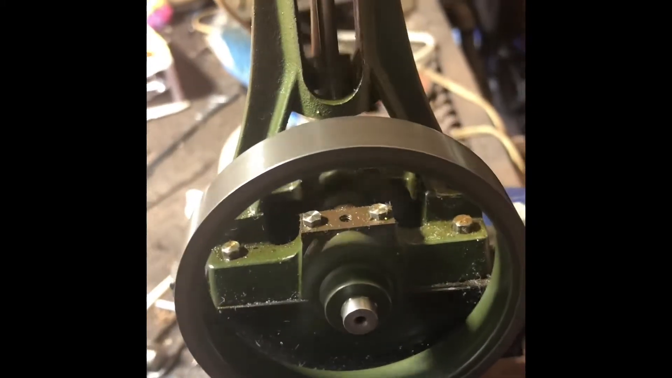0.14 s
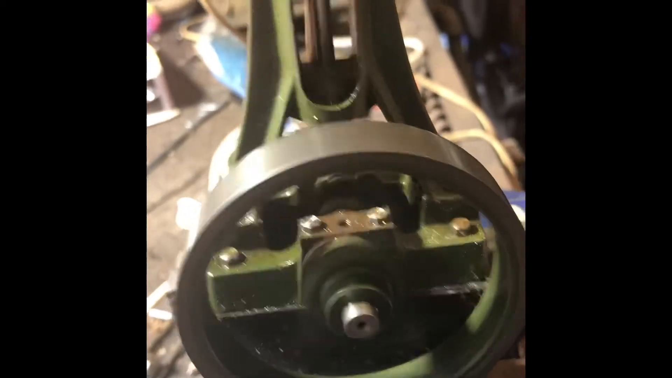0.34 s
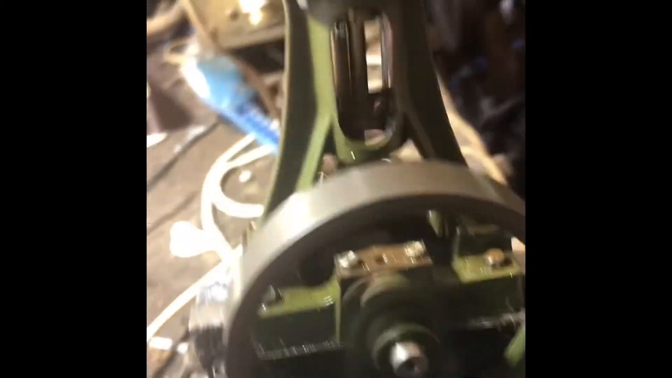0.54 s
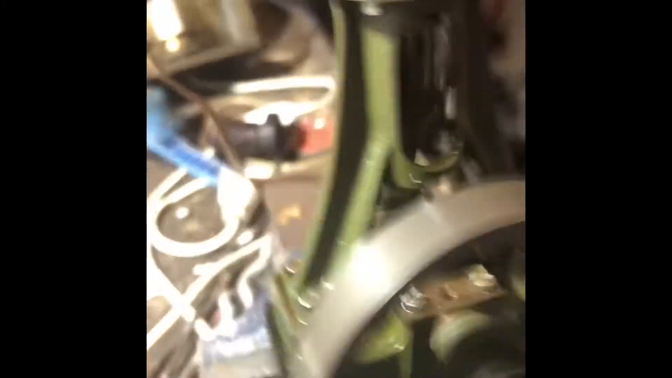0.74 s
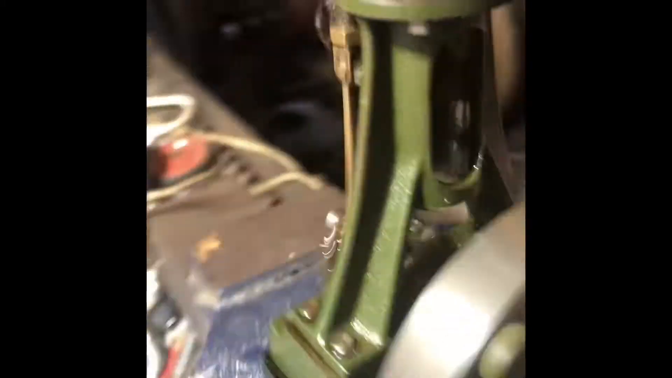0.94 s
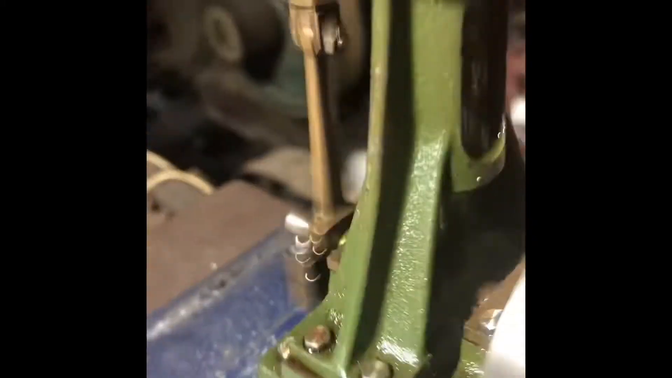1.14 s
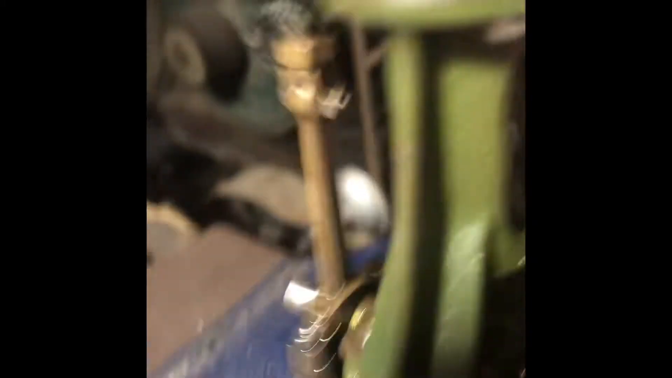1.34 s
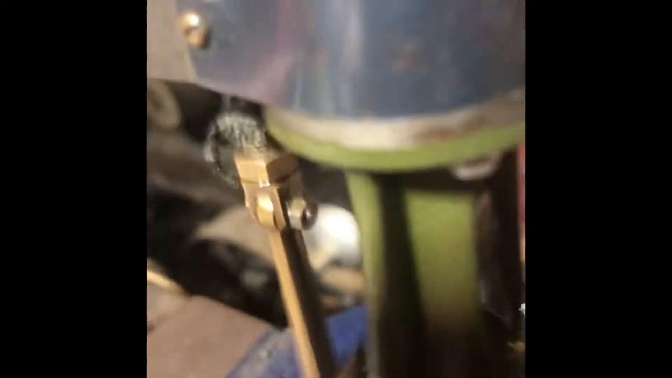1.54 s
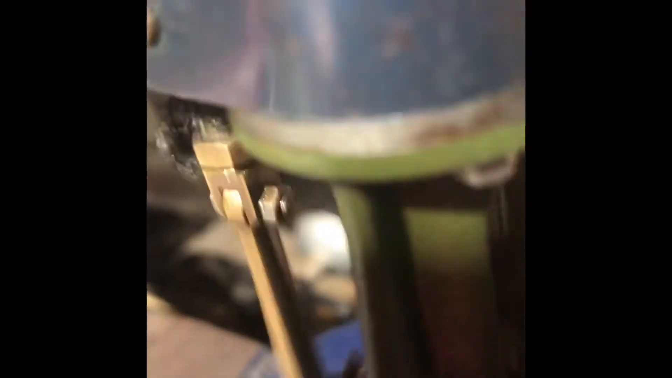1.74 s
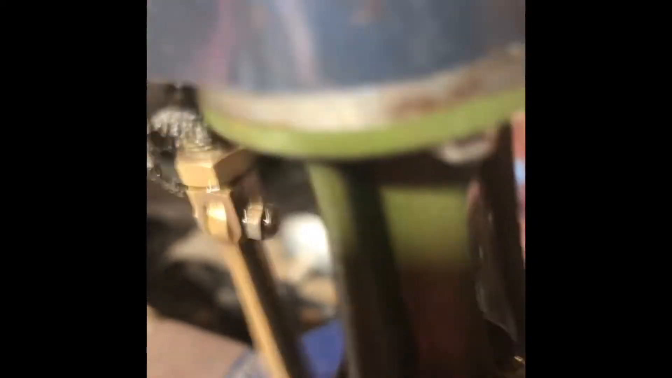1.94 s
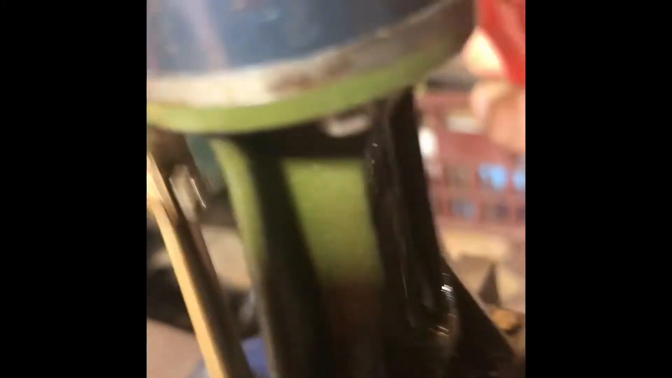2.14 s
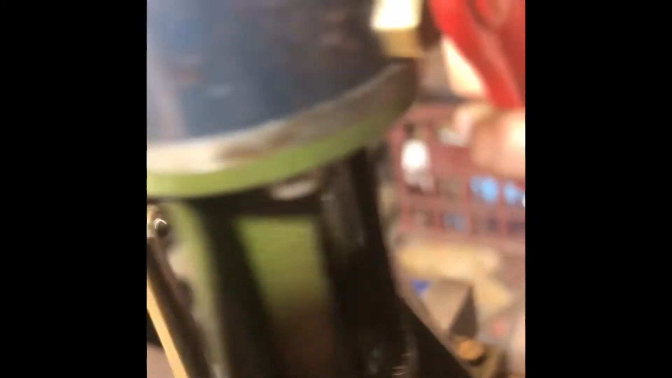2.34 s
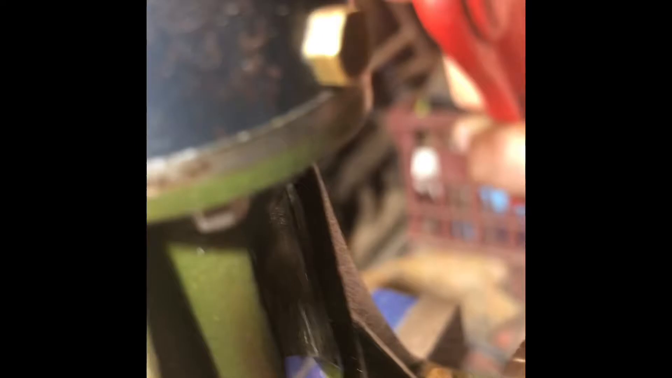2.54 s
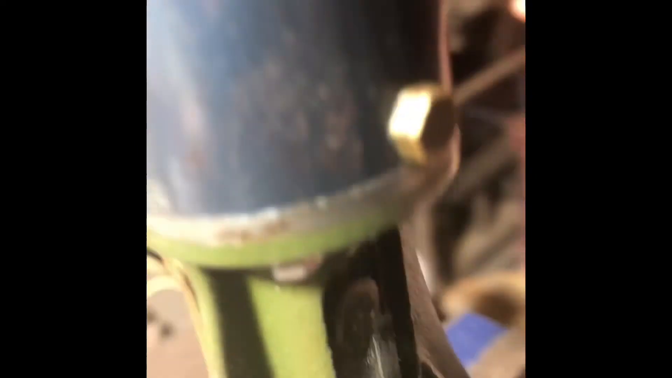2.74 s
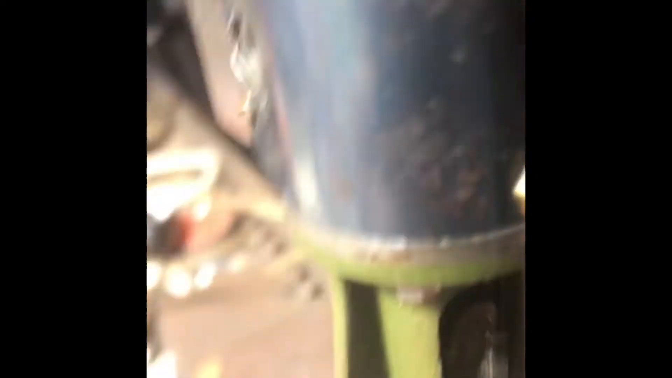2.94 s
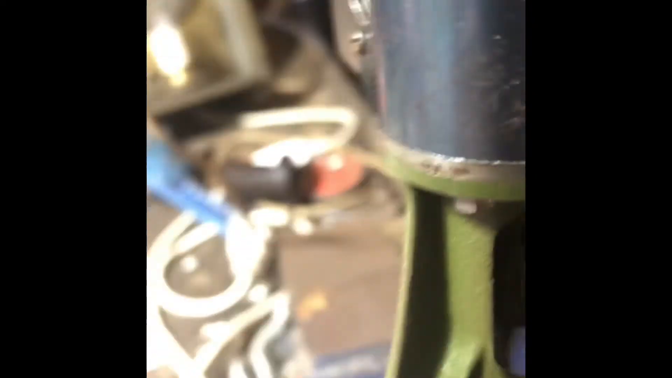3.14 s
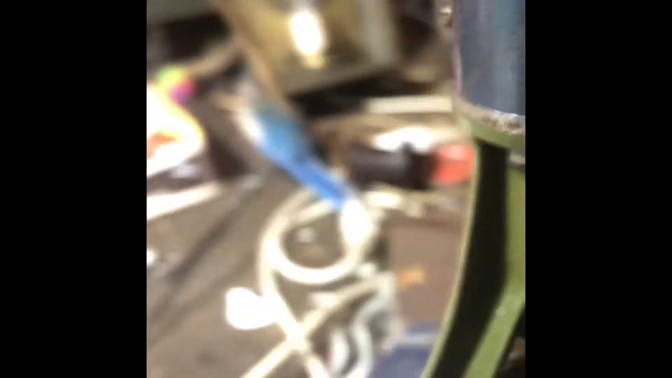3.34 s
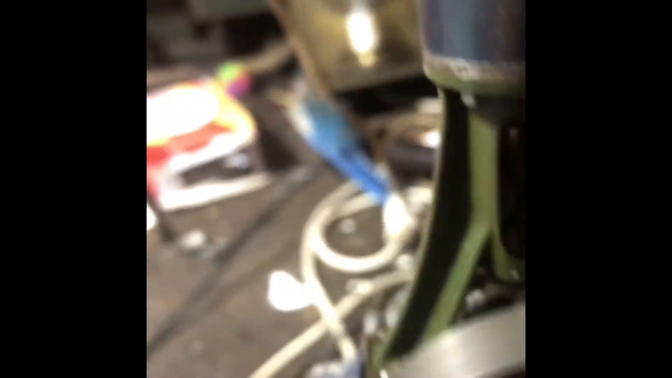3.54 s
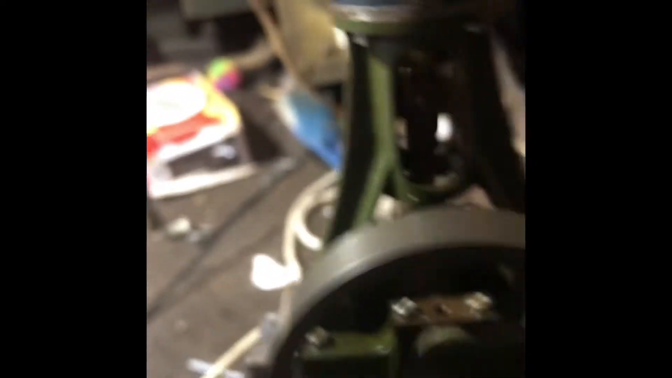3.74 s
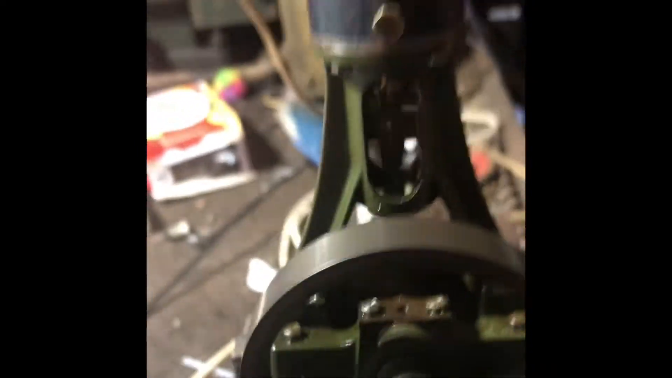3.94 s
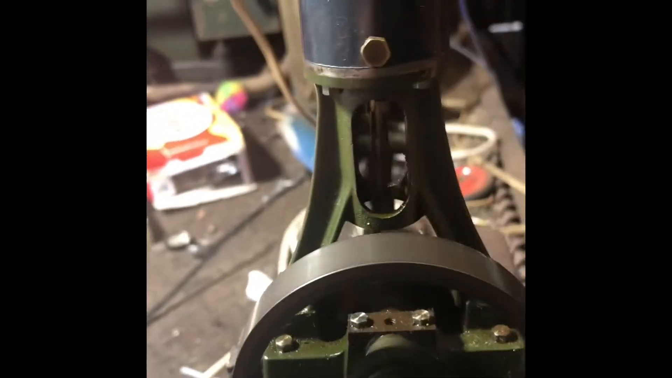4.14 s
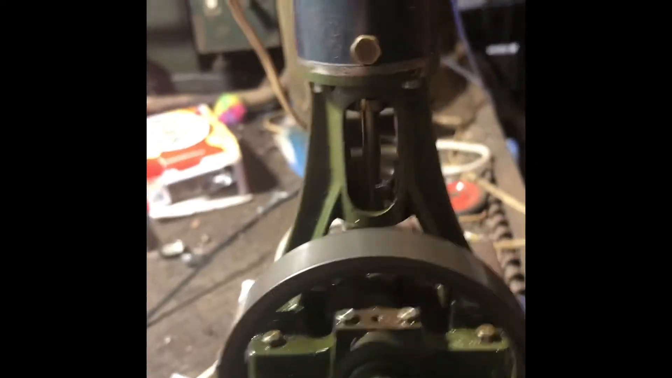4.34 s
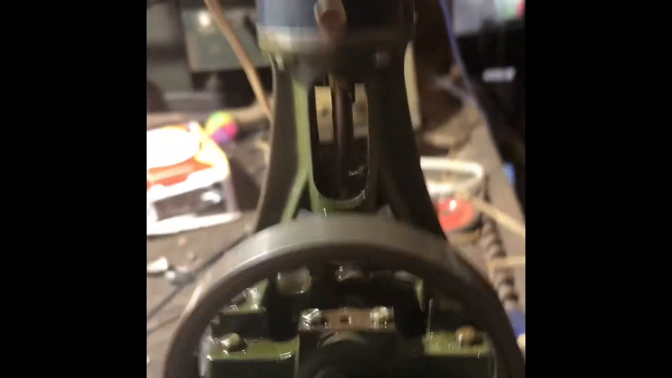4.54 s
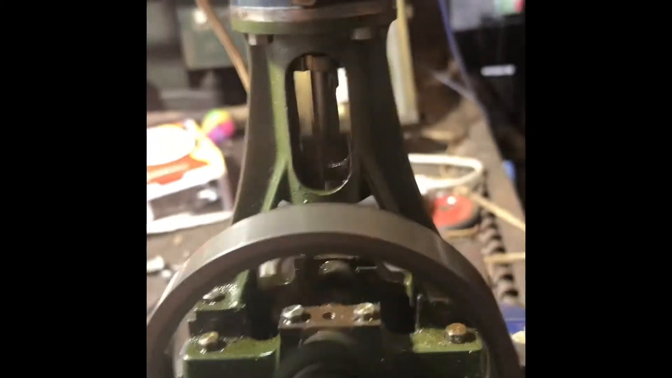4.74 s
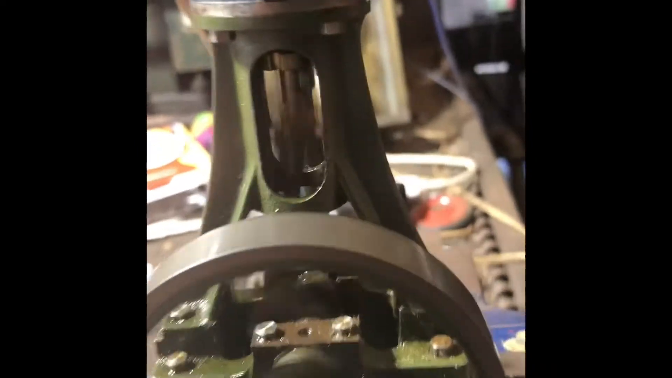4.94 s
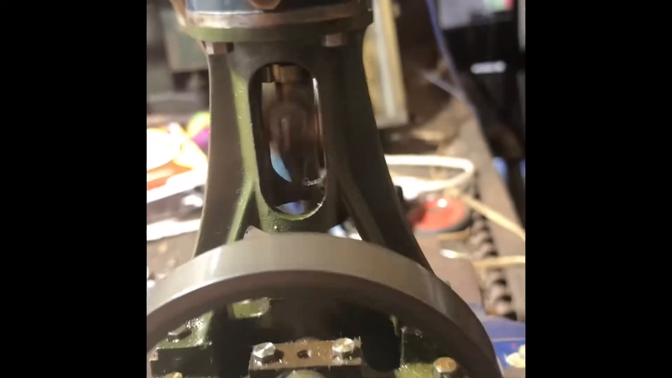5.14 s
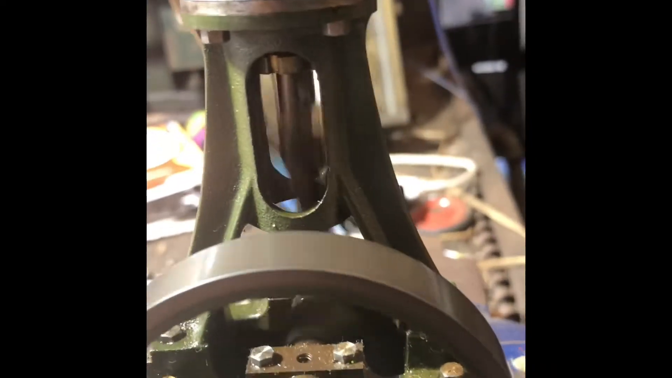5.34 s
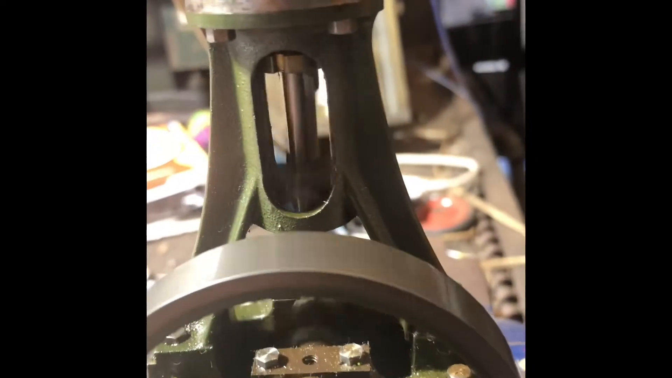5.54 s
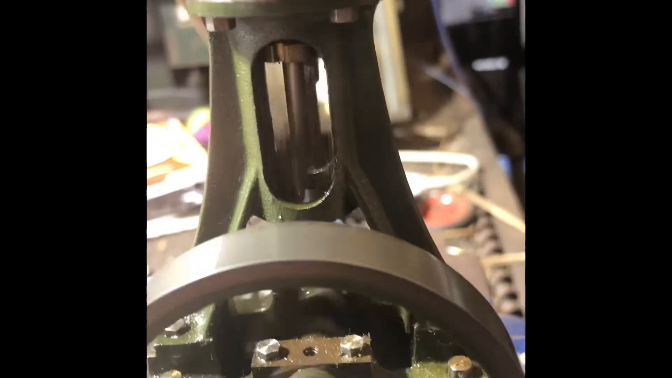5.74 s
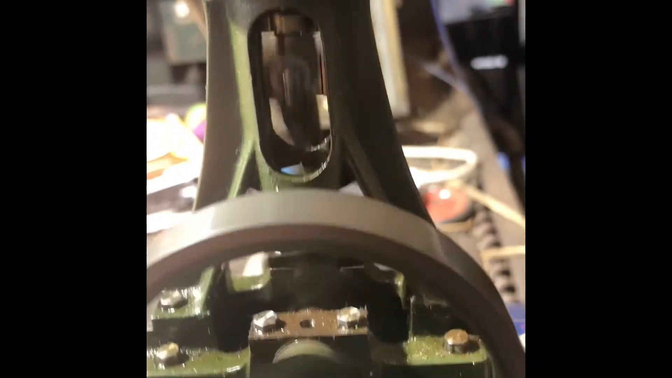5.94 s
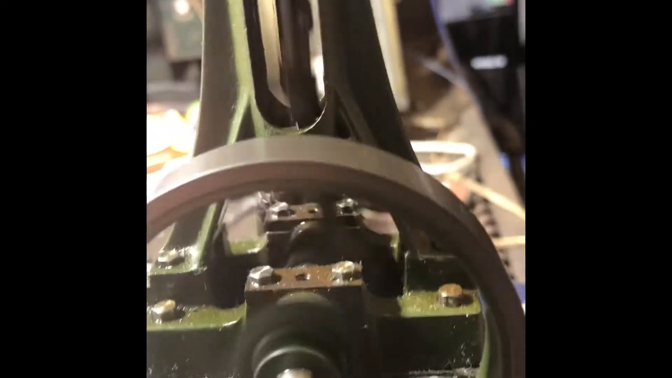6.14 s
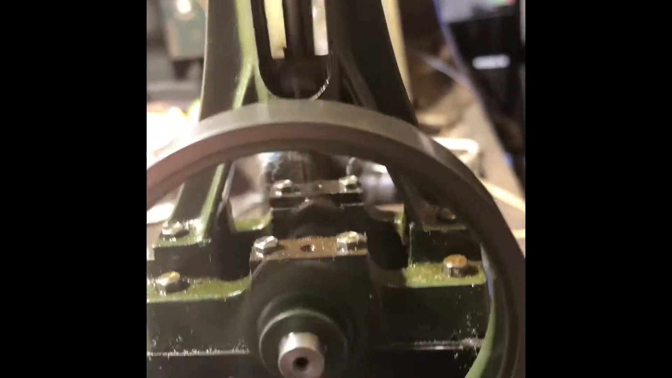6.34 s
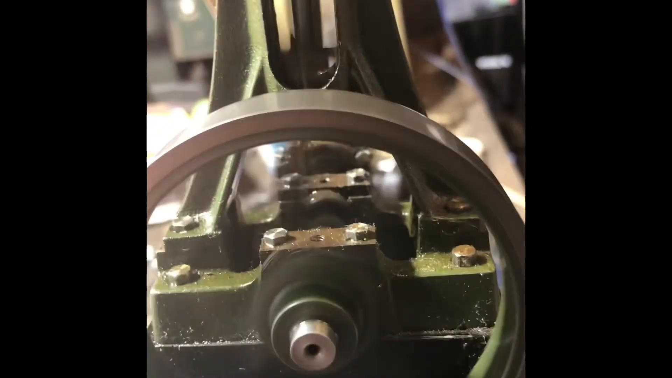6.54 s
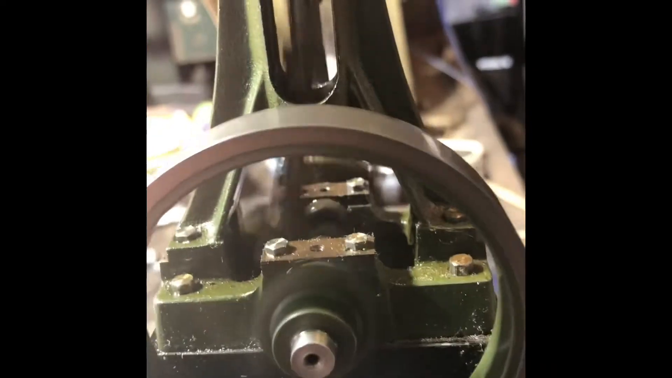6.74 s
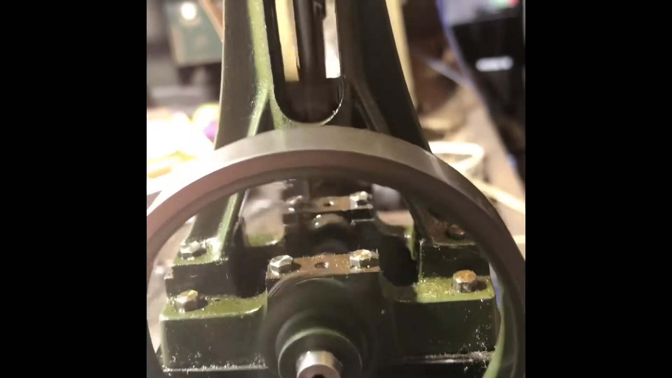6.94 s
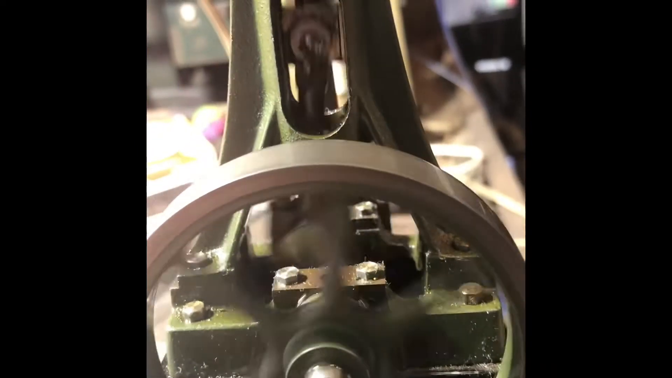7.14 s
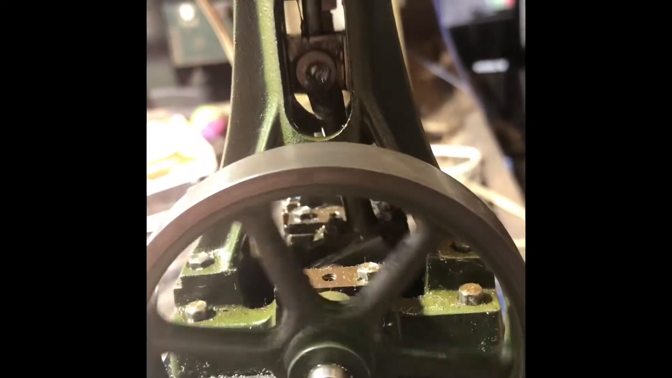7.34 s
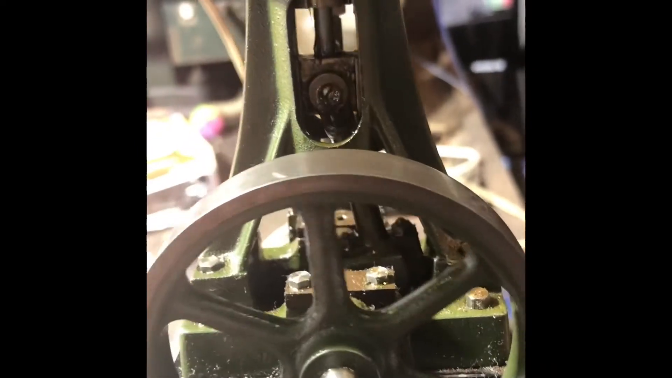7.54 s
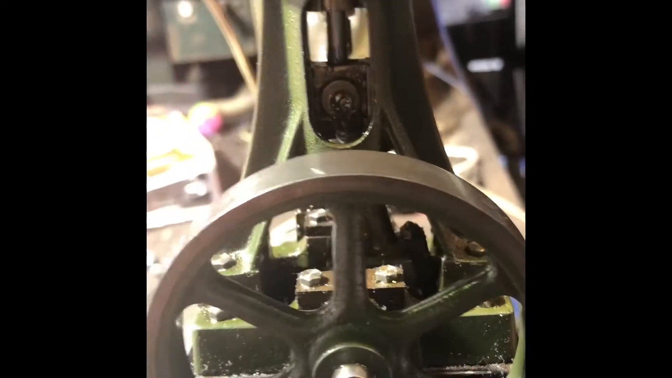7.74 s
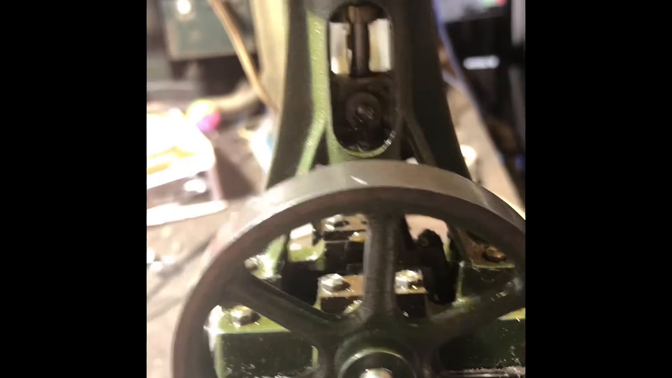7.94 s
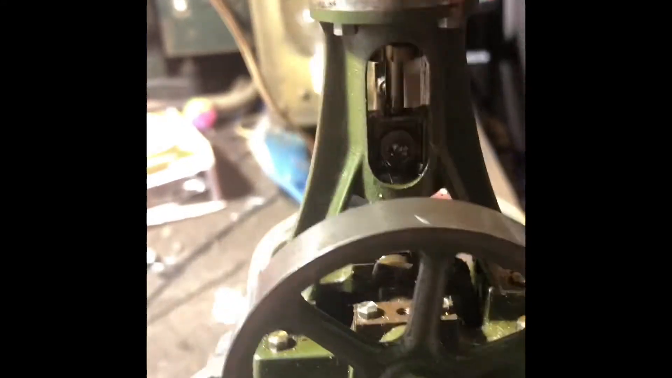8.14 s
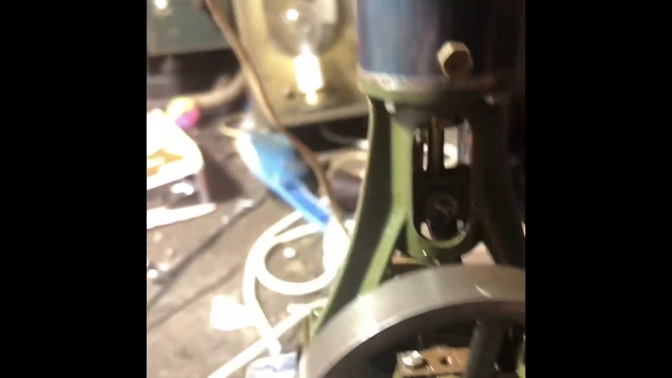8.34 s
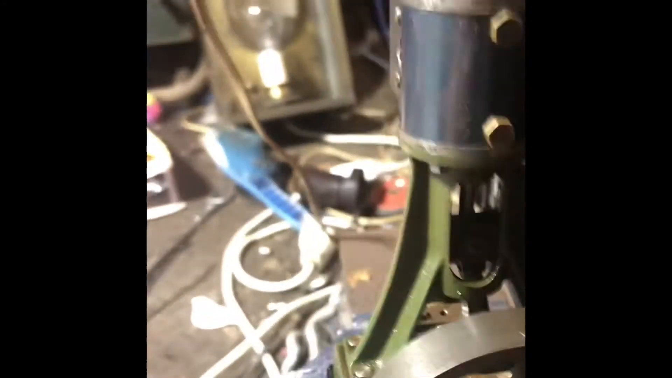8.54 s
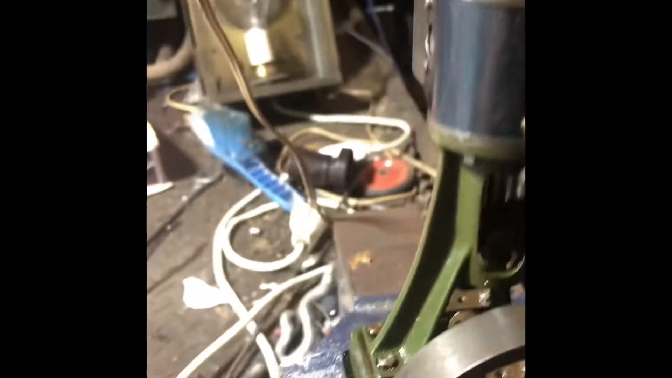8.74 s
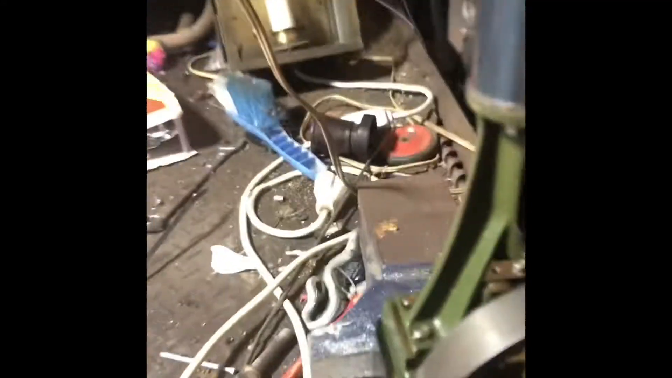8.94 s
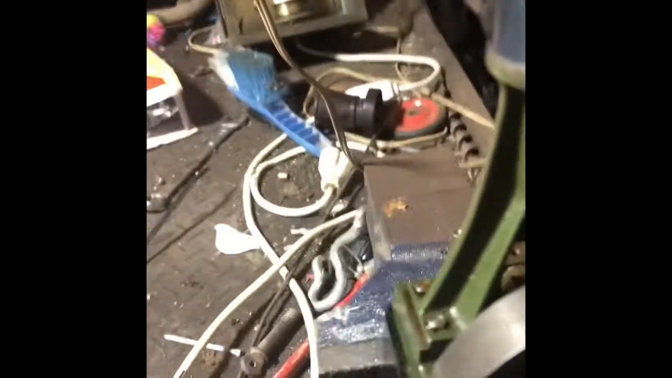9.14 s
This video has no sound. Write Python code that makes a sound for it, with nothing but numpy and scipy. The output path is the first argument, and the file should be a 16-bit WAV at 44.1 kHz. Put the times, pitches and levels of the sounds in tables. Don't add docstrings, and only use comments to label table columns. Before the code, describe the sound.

Close, dry, mono handheld pickup of rapid airy chuffing, merged into a fluttering treble-heavy hiss that slows slightly and dips in level midway. The flow collapses just before seven seconds and a small fitting pings. What remains is a low buzzing compressor across the workshop, faint air hiss and rumble, several muffled bench thuds, one crisp click with a rebound, and a final firmer knock.

```python
import sys
import numpy as np
from scipy import signal
from scipy.fft import rfft, irfft, next_fast_len
from scipy.io import wavfile
from scipy.ndimage import uniform_filter1d

SR = 44100
rng = np.random.default_rng(int(sys.argv[2]) if len(sys.argv) > 2 else 0)


def to_wav(sig):
    pcm = np.clip(np.atleast_2d(sig), -1, 1) * 32767
    pcm = np.round(pcm).astype(np.int16)
    wavfile.write(sys.argv[1], SR, pcm.T)


def nominal_scale(level):
    x = np.asarray(level, float) / 20
    return 10 ** x


N = 405259
T = np.arange(N) / SR


# (time [s], jet level [dB], place behind the cylinder [0-1], workshop screened [dB], ridges [dB])
MIC_PATH = [(0, -15, 0.01, -1.5, 3), (.55, -13.5, .3, -0.2, 1.7), (.9, -13, .7, -5.5, -3),
            (1.3, -12, 1.01, -8.5, -4), (1.7, -12.5, 1.1, -8, -2), (2.2, -13, .8, -7, -5),
            (2.7, -13.5, .55, -5.5, -1.5), (3.05, -16.5, .2, -6.5, -1.7), (3.4, -20, .05, -5.5, 1.2),
            (3.8, -17.5, 0.01, -2, -1), (4.45, -16.5, -.1, -0.5, -0.5), (5.3, -15.5, .05, -0.1, 0.5),
            (6.0, -15, .05, -0.6, -2), (6.55, -15, .1, -0.3, -8), (6.9, -16.5, -.1, -1, -15)]
# (time [s], level [dB])
SHUT_OFF = [
    (6.84, -3),
    (6.888, -5),
    (6.895, -4.5),
    (6.925, -15.5),
    (6.94, -25),
    (6.97, -47),
]
# (extra delay [s], level [dB])
ECHOES = [
    (.0006, -16.5),
    (.0013, -27),
    (.0027, -15),
    (.0049, -15.5),
]


def exhaust():
    jet_db, behind, screen_db, ridge_db = columns(MIC_PATH, T)
    upper, lower, gland, spit = port_openings()
    flows = jet_flows(upper, lower, spit, behind)
    jet = turbulent_jet(flows, behind, ridge_db)
    frame = frame_sound(screen_db, jet_db)
    gland_open = (gland + 0.15) * nominal_scale(1.2 * drift(9))
    direct = jet + np.sqrt(flows[1]) * frame + gland_open * gland_whistle(gland, behind)
    echoes = 0
    for delay, db in ECHOES:
        moving_delay = delay * (1 + 0.0607 * drift(0.426))
        echoes = echoes + nominal_scale(db) * np.interp(T - moving_delay, T, direct)
    supply_db = columns(SHUT_OFF, T)[0]
    return nominal_scale(jet_db - 0.9 + supply_db) * shadowed(direct + echoes) * (T < SHUT_OFF[-1][0])


# (time [s], rate [turns/s])
FLYWHEEL_SPEED = [(0.0, 20.59), (0.4, 21.02), (0.8, 21.05), (1.2, 20.19), (1.6, 18.05), (1.9, 16.55),
                  (2.3, 16.31), (2.8, 15.28), (3.4, 14.91), (4.0, 14.67), (4.5, 14.73), (4.9, 15.62),
                  (5.7, 16.59), (6.3, 15.89), (7.0, 15.49)]
START_TURN = -0.24
# (opens at [turns], stays open [turns], attack [turns], release [turns], sag while open [dB])
UPPER_PORT = (0.7, 0.57, 0.19, 0.25, -11)
LOWER_PORT = (0.19, 0.46, 0.2, 0.039, 0.5)
GLAND_GAP = (0.56, 0.59, 0.12, 0.084, 2.1)
VALVE_SPIT = (0.085, 0.073, 0.03, 0.015, 0.1)


def port_openings():
    turn = START_TURN + np.cumsum(columns(FLYWHEEL_SPEED, T)[0]) / SR
    return [opening(turn, *port) for port in (UPPER_PORT, LOWER_PORT, GLAND_GAP, VALVE_SPIT)]


def opening(turn, opens, length, attack, release, sag_db):
    age = (turn - opens) % 1
    rise = np.clip(age / attack, 0, 1)
    fall = np.clip((length - age) / release, 0, 1)
    return rise * fall * nominal_scale(sag_db * (age / length - 0.5))


# (level re jet in front [dB], change behind the cylinder [dB])
LOWER_DB, LEAK_DB, SKIRT_DB = (-3, 1.5), (-3.5, -5.5), (-19, 1)
GLAND_UPPER_DB, GLAND_LOWER_DB = (-3, -14), (-3.8, -21)
# (dull, middle, bright part of the jet [dB])
LOWER_TINT_DB, LEAK_TINT_DB, SPIT_DB = (-3.5, -1, 3), (1, -0.5, 5.5), (1, 1, -10)


def seen_db(level, behind):
    front, change = level
    return front + change * behind


def jet_flows(upper, lower, spit, behind):
    lower_db, leak_db = seen_db(LOWER_DB, behind), seen_db(LEAK_DB, behind)
    flutter = nominal_scale(0.44 * drift(23))
    flows = []
    for lower_tint, leak_tint, spit_db in zip(LOWER_TINT_DB, LEAK_TINT_DB, SPIT_DB):
        ports = upper ** 2 + (lower * nominal_scale(lower_db + lower_tint)) ** 2
        steady = nominal_scale(2 * (leak_db + leak_tint))
        flow = np.sqrt(ports + steady + (spit * nominal_scale(spit_db)) ** 2)
        running_rms = np.sqrt(uniform_filter1d(flow ** 2, size=SR // 4))
        flows.append(flow / running_rms * flutter)
    return flows


# (frequency [Hz], spectral density [dB])
JET_SPECTRUM = [(2290, -34), (3900, -6.5), (4270, -4), (4790, -5), (5370, -3.5), (7220, -4.5), (8290, -1.5),
                (9470, -3), (10400, -1.5), (12100, -2), (15200, -1), (16200, 3.5), (16500, -52)]
# (frequency [Hz], spectral density [dB])
JET_SKIRT = [(2000, -20.5), (2600, -6.5), (3200, 1.5), (3900, -1.5), (4600, -16.5)]
# (time [s], frame low [Hz], frame high [Hz], gland upper [Hz], gland lower [Hz])
VIEW_RESONANCES = [(0, 4200, 12800, 11300, 10800), (.55, 4400, 12800, 11400, 10700),
                   (1.1, 4100, 11500, 11360, 10400), (1.5, 4000, 11700, 10850, 10500),
                   (2.1, 4100, 12500, 11540, 10500), (2.8, 4000, 12400, 12600, 10500),
                   (3.4, 4050, 13000, 10600, 9950), (4.0, 4260, 12600, 11180, 10000),
                   (4.6, 4500, 13000, 11430, 10500), (5.1, 4600, 12950, 11200, 10400),
                   (5.5, 4650, 13100, 11120, 10150), (5.95, 4700, 13230, 11600, 10520),
                   (6.15, 4750, 13200, 11600, 9600), (6.9, 4940, 12700, 11570, 9500)]
RIDGE_DB = (-12, -8.5, -6.5)
BRIGHT_HZ = 10500


def turbulent_jet(flows, behind, ridge_db):
    dull, flow, bright = flows
    low_hz, high_hz = columns(VIEW_RESONANCES, T)[:2]
    low, middle, high = [nominal_scale(db + ridge_db) for db in RIDGE_DB]
    high = high * nominal_scale(5.5 * (behind - 0.4))
    broad = coloured(JET_SPECTRUM)
    under = signal.sosfilt(signal.butter(2, BRIGHT_HZ, fs=SR, output="sos"), broad)
    over = signal.sosfilt(signal.butter(2, BRIGHT_HZ, "high", fs=SR, output="sos"), broad)
    skirt = nominal_scale(seen_db(SKIRT_DB, behind)) * coloured(JET_SKIRT)
    jet = dull * (skirt + low * narrow(low_hz, width_hz=730))
    jet += flow * (under + middle * narrow(8800, width_hz=1400))
    jet += bright * (high * narrow(high_hz, width_hz=1000) - over)
    return jet


def gland_whistle(gland, behind):
    climb = 1 + 0.03 * (gland - 0.6)
    upper_hz, lower_hz = [hz * climb for hz in columns(VIEW_RESONANCES, T)[2:]]
    upper = nominal_scale(seen_db(GLAND_UPPER_DB, behind)) * narrow(upper_hz, width_hz=650)
    lower = nominal_scale(seen_db(GLAND_LOWER_DB, behind)) * narrow(lower_hz, width_hz=700)
    return upper + lower


# (frequency [Hz], spectral density [dB])
BODY_SPECTRUM = [(590, -45), (1000, -4.5), (1310, -5.5), (1420, -8), (1700, -2.5), (2900, 1.5), (3770, -24),
                 (6380, -120)]


def frame_sound(screen_db, jet_db):
    share = 0.7
    return nominal_scale(-33 + share * screen_db - jet_db) * coloured(BODY_SPECTRUM)


# (from [s], to [s], from frequency [Hz], to frequency [Hz], depth [dB])
SHADOWS = [
    (-.3, .9, 3400, 3380, -1.3),
    (.55, 1.4, 11500, 8800, -4),
    (1.9, 3.0, 7540, 7000, -1.83),
    (3.2, 4.9, 5240, 5500, -3),
    (3.9, 5.901, 12500, 12400, -3),
    (3.5, 7.2, 3500, 4100, -3),
    (4.8, 6.6, 5440, 5900, -1.7),
    (4.9, 6.2, 13700, 14000, -1.5),
    (5.8, 7.201, 10400, 10500, -4),
    (6.0, 7.2, 7600, 7250, -2.5),
]


def shadowed(x):
    width_hz, edge_s = 334, 0.19
    hz, s, frames = signal.stft(x, SR, nperseg=512)
    loss_db = 0
    for start, end, first_hz, last_hz, db in SHADOWS:
        centre = first_hz + (last_hz - first_hz) * (s - start) / (end - start)
        present = np.clip(np.minimum(s - start, end - s) / edge_s, 0, 1)
        notch = np.exp(-0.5 * ((hz[:, None] - centre) / width_hz) ** 2)
        loss_db = loss_db + db * present * notch
    return signal.istft(frames * nominal_scale(loss_db), SR)[1][:N]


# (frequency [Hz], level [dB], T60 [s])
FITTING_MODES = [
    (8683, -17, .15),
    (9350, -14, .04),
    (10903, 0, .38),
    (10937, -.5, .36),
    (12200, -16, .04),
]
# (time [s], level [dB])
FITTING_TAPS = [
    (6.966, -44),
    (6.974, -35),
]


def ringing_fitting():
    return sum(ring(s, db + mode_db, hz, t60) for s, db in FITTING_TAPS for hz, mode_db, t60 in FITTING_MODES)


# (time [s], peak level [dB])
TICKS = [
    (7.858, -17.5),
    (7.8804, -23),
]


def dry_ticks():
    crack = coloured([(800, -30), (1500, 5), (6500, -1.0), (16000, -14)])
    out = np.zeros(N)
    for s, db in TICKS:
        age = T - s
        decay_db = 60 * np.clip(age / 0.019, 0, 3)
        out += (age > 0) * nominal_scale(db - 8.0 - decay_db) * crack
    return out


# (time [s], peak level [dB], frequency [Hz], T60 [s])
BENCH_KNOCKS = [(7.058, -42, 150, .07), (7.191, -26, 143, 0.081), (7.21, -27, 200, .06),
                (7.241, -28, 90, 0.072), (7.281, -27, 120, .07), (7.482, -28, 245, 0.1),
                (7.51, -24, 109, .1), (7.539, -27, 170, .07), (7.671, -28, 323, .06), (7.98, -33, 70, .12),
                (8.048, -26, 184, .06), (8.79, -24, 770, 0.076), (8.792, -29, 930, .03),
                (8.795, -29, 450, .05), (8.8, -30, 170, .07)]


def bench_knocks():
    return sum(ring(*knock) for knock in BENCH_KNOCKS)


STROKE_HZ = 45.926
# (multiple of the stroke rate, level [dB])
STROKE_PARTIALS = [(1, -15), (2, -2), (3, -9), (4, -3), (5, -7), (6, -8), (7, -4), (8, -4), (9, -7),
                   (10, -17), (11, -12), (12, -13), (13, -18), (14, -10), (16, -12), (17, -1), (18, -5),
                   (19, -4), (20, -14), (21, -25), (28, -16), (29, -12), (30, -9), (31, -13), (32, -12),
                   (33, -7), (34, -23), (38, -22), (41, -29), (52, -29)]
PARTIAL_LAG = [(1, 0), (9, 0), (16, .2), (17, .55), (20, -.42), (29, .7), (30, .55), (34, 1.6), (52, 4.3)]


def stroke_harmonics():
    ranges = np.zeros((4, N))
    wander = [nominal_scale(0.7 * drift(0.4)) for _ in range(6)]
    multiples = np.arange(52) + 1
    lag = np.cumsum(columns(PARTIAL_LAG, multiples)[0]) + rng.normal(0, 0.14, len(multiples))
    levels = columns(STROKE_PARTIALS, multiples)[0]
    levels = levels + (levels < -18.5) * 3 * rng.standard_normal(len(multiples))
    stroke = np.exp(2j * np.pi * (STROKE_HZ * T - 0.7))
    partial = 1
    for k, db, turns in zip(multiples, levels, lag):
        partial = partial * stroke
        tone = (partial * (np.sqrt(2) * nominal_scale(db) * np.exp(-2j * np.pi * turns))).real
        place = (0, 1, 0, 2, 3, 1)[np.searchsorted((5, 20, 27, 31, 34), k)]
        ranges[place] += wander[k % 6] * tone
    return ranges


# (time [s], thump level [dB], lower over upper head [dB])
STANDING_PATTERN = [(0, -41.5, 0.1), (.6, -42.5, -0.5), (1.2, -51, -1), (2.2, -54, -1), (2.8, -50, 3.5),
                    (3.5, -47.5, 1.5), (4.6, -50, 0.1), (5.4, -42, 1), (6.9, -45, 3.5), (7.5, -44.5, 1),
                    (8.05, -38, 1), (8.2, -36, 0), (8.7, -34.5, -1), (9.19, -34, -2.5)]
# (level [dB], share of screening, share of head tilt)
RANGE_LEVELS = [
    (-42.5, 0.97, 0.01),
    (-43, 0.58, 0.84),
    (-42.5, 2, -1.3),
]


def compressor():
    thump, *upper_ranges = stroke_harmonics()
    screen_db = columns(MIC_PATH, T)[2]
    thump_db, tilt_db = columns(STANDING_PATTERN, T)
    since_knock = T - 8.81
    duck_db = -8 * np.exp(-np.abs(since_knock) / 0.07) * np.clip(since_knock / 0.03 + 1, 0, 1)
    duck = nominal_scale(-8 * np.exp(-np.abs(since_knock) / 0.07) * np.clip(since_knock / 0.03 + 1, 0, 1))
    drone = nominal_scale(thump_db) * duck * thump
    for (db, share, lean), tones in zip(RANGE_LEVELS, upper_ranges):
        drone += nominal_scale(db + share * screen_db + lean * tilt_db + creep_db()) * tones
    return drone


# (multiple of the stroke rate, level [dB], loudest at [s])
VALVE_REEDS = [
    (61, -47, 8.35),
    (65, -51, 8.0),
    (81, -50, 8.2),
    (94, -49, 8.35),
    (125, -55, 8.3),
]
# (frequency [Hz], spectral density [dB])
FAR_HISS = [(1030, -17), (1750, -9.5), (2550, -8), (2880, -8.5), (3340, -7.5), (4040, -10.5), (4470, -10),
            (4600, -10.5), (5660, -9.5), (8010, -18), (9220, -12.5), (9940, -20), (15200, -20),
            (16000, -12), (16500, -40)]


def far_air():
    rise = nominal_scale(1.2 * (creep_db() - CREEP_DB) + 1.56)
    reeds = 0
    for k, db, s in VALVE_REEDS:
        swell = nominal_scale(db - 9.0 * np.abs(T - s) + 0.7 * drift(3))
        reeds = reeds + swell * np.sin(2 * np.pi * round(k) * STROKE_HZ * T + 0.27 * drift(2.4))
    stroke = np.maximum(np.cos(2 * np.pi * (STROKE_HZ * T - 0.9)), 0) + 0.45
    chatter = nominal_scale(-57) * stroke * narrow(9150, width_hz=330)
    return reeds + rise * (nominal_scale(-45.5) * coloured(FAR_HISS) + chatter)


# (frequency [Hz], spectral density [dB])
BENCH_SPECTRUM = [(25, -36), (45, 1), (100, -4), (220, 4.5), (300, -0.5), (450, -24)]
# (frequency [Hz], spectral density [dB])
ROOM_SPECTRUM = [(25, -27), (70, -3.5), (270, 0.5), (450, -1.5), (800, -4), (960, -8), (1150, -15),
                 (1400, -4), (1700, -23), (2600, -27.5)]


def rumble():
    screen_db = columns(MIC_PATH, T)[2]
    turning = np.clip((7.7 - T) / 0.5, 0, 1)
    running = np.minimum(nominal_scale(columns(SHUT_OFF, T)[0]), 1)

    def level_db(run, rest, on, share, follow):
        return rest + (run - rest) * on + share * screen_db + follow * creep_db()

    bench_db = level_db(-42.5, -54, turning, share=0.15, follow=0.2)
    room_db = level_db(-36, -47.5, running, share=1.2, follow=0.6)
    bench = nominal_scale(bench_db + 1.2 * drift(4.9)) * coloured(BENCH_SPECTRUM)
    return bench + nominal_scale(room_db + 1.0 * drift(3.1)) * coloured(ROOM_SPECTRUM)


CREEP_FROM_S, CREEP_S, CREEP_DB = 6.86, 0.97, 8


def creep_db():
    return CREEP_DB * np.clip((T - CREEP_FROM_S) / CREEP_S, 0, 1)


def rms_one(x):
    return x / np.sqrt(np.mean(x ** 2) + 1e-20)


def columns(rows, at):
    first, *rest = np.transpose(rows)
    return [np.interp(at, first, c) for c in rest]


def coloured(spectrum):
    size = next_fast_len(N)
    hz = np.arange(size // 2 + 1) * SR / size + 1
    points = np.array(spectrum)
    gain = nominal_scale(np.interp(np.log(hz), np.log(points[:, 0]), points[:, 1]))
    return rms_one(irfft(rfft(rng.standard_normal(size)) * gain, size)[:N])


def drift(rate):
    r = np.exp(-80 * np.pi * rate / SR)
    slow = signal.lfilter([1], [1, -2 * r, r * r], rng.standard_normal(N // 40 + 2002))[2000:]
    return np.interp(np.arange(N) / 40, np.arange(len(slow)), rms_one(slow))


def narrow(hz, width_hz):
    sos = signal.butter(2, width_hz / 2, fs=SR, output="sos")
    a, b = signal.sosfilt(sos, rng.standard_normal((2, N)))
    phase = 2 * np.pi * np.cumsum(hz * np.ones(N)) / SR
    return rms_one(a * np.cos(phase) + b * np.sin(phase))


def ring(s, db, hz, t60):
    out, at = np.zeros(N), round(s * SR)
    age = T[:min(round(2 * t60 * SR), N - at)]
    out[at:at + len(age)] = nominal_scale(db - 60 * age / t60) * np.sin(2 * np.pi * hz * age)
    return out


def scene():
    engine = exhaust() + ringing_fitting() + dry_ticks() + bench_knocks()
    background = compressor() + far_air() + rumble()
    return np.tile(engine + background, (2, 1))


def low_pass(x):
    return signal.sosfilt(signal.butter(12, 17070, fs=SR, output="sos"), x)


def record(dry):
    bass_cut = signal.butter(2, 34, "high", fs=SR, output="sos")
    thin = signal.sosfiltfilt(bass_cut, dry, padtype="even", padlen=SR // 4)
    rounded = 1.05 * np.tanh(thin / 1.05)
    top_cut = signal.ellip(12, 0.5, 80, 15750, fs=SR, output="sos")
    return low_pass(signal.sosfilt(top_cut, rounded))


dry = scene()
out = record(dry)
to_wav(out)
```